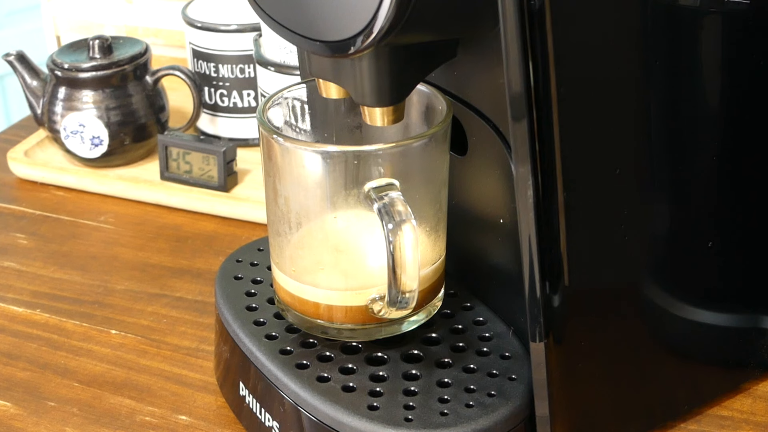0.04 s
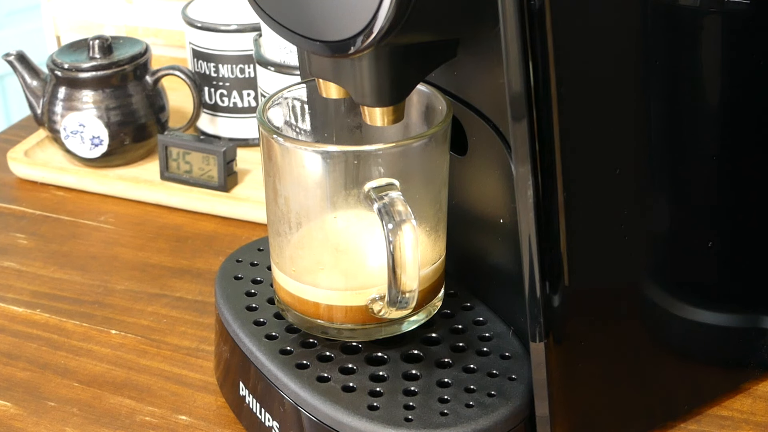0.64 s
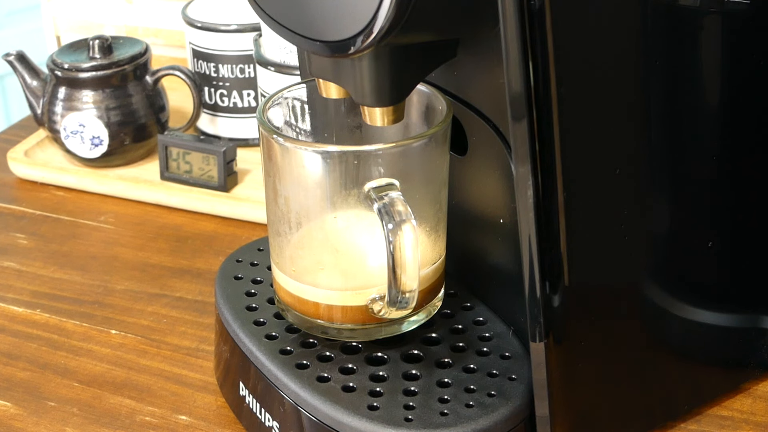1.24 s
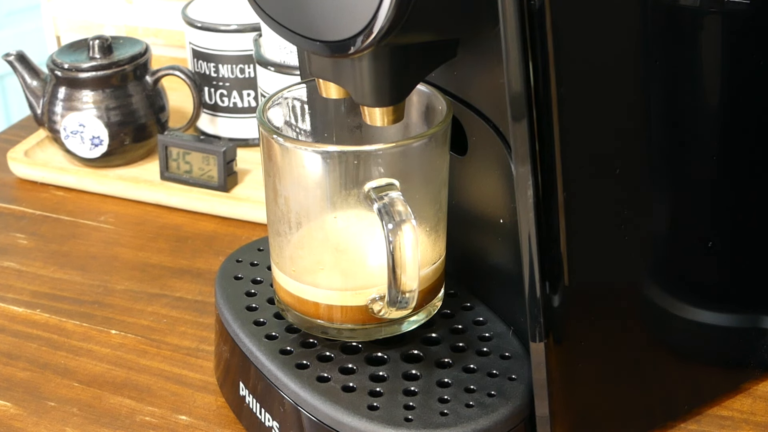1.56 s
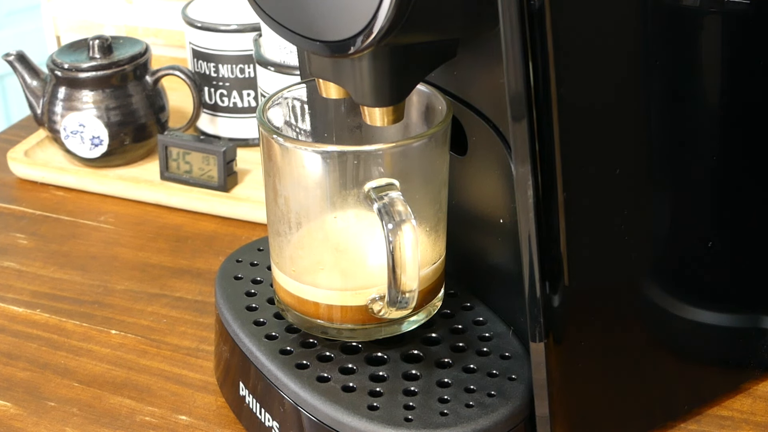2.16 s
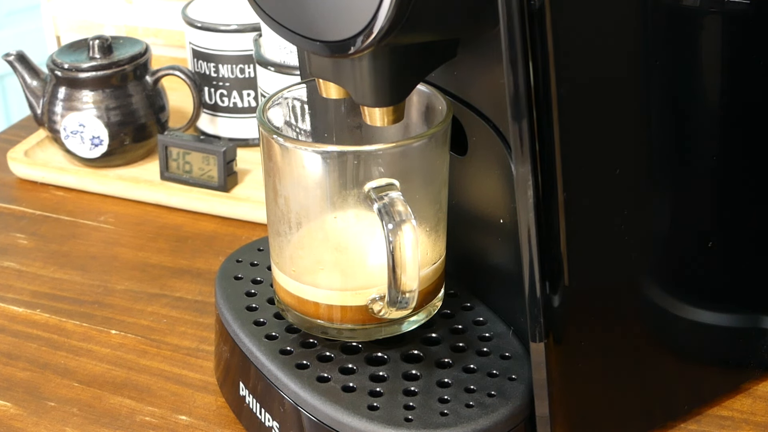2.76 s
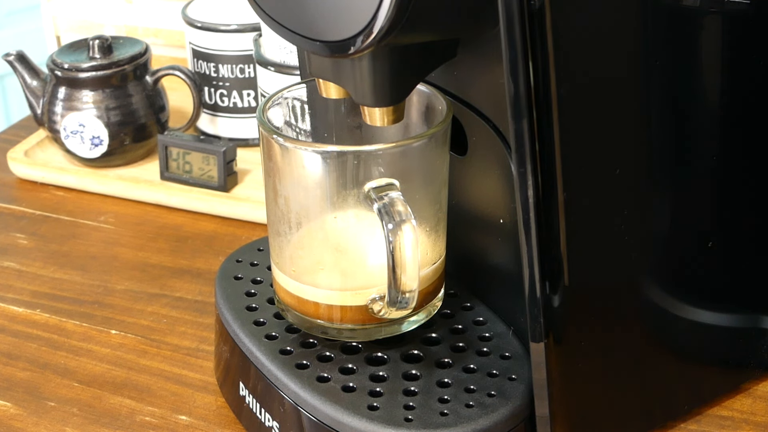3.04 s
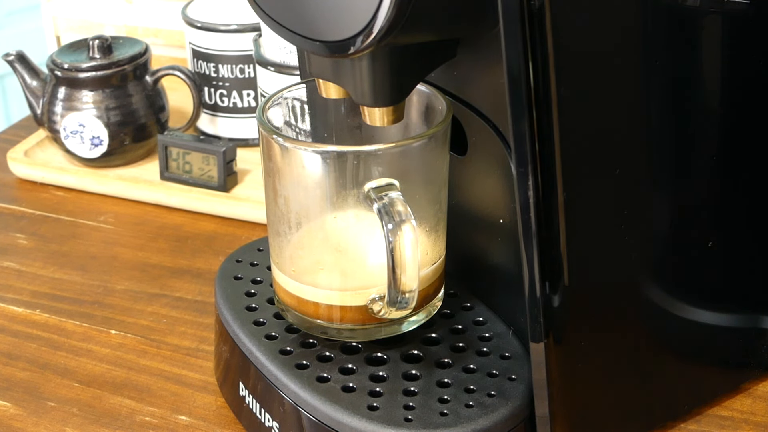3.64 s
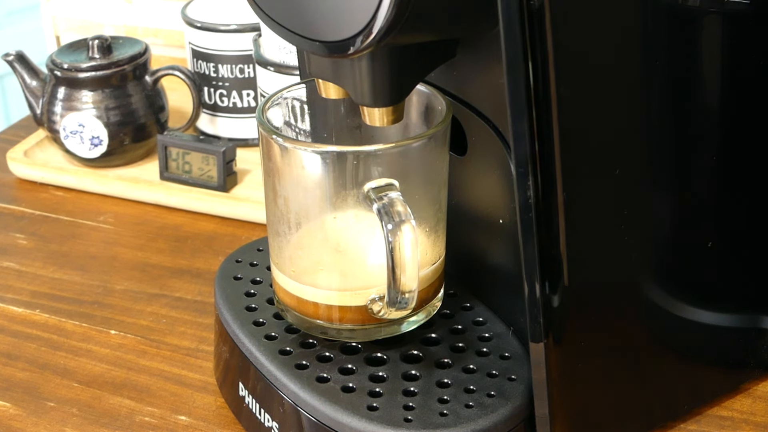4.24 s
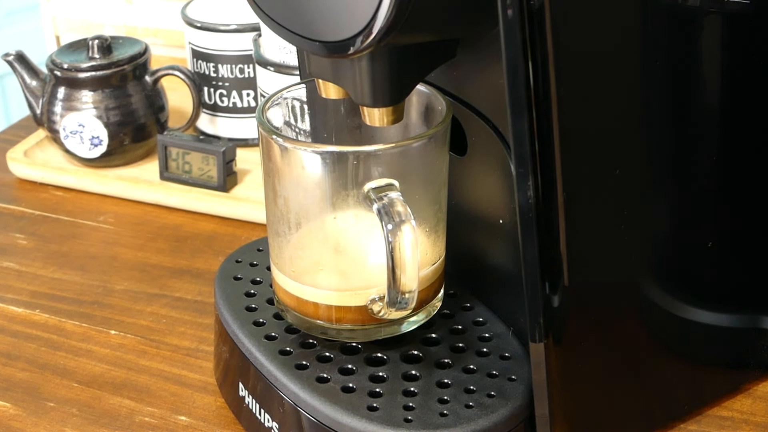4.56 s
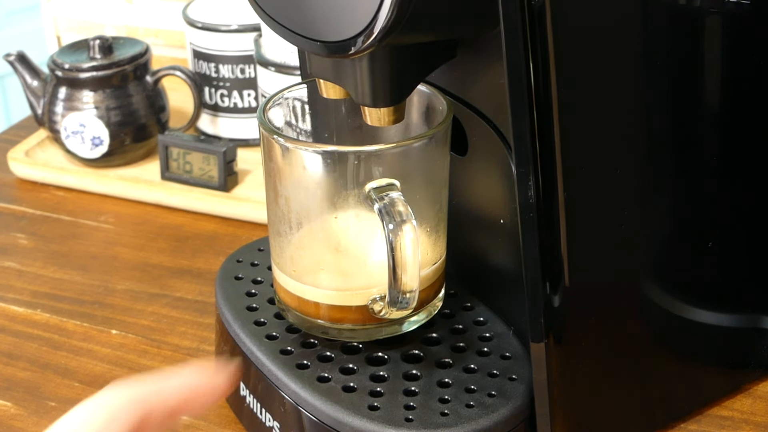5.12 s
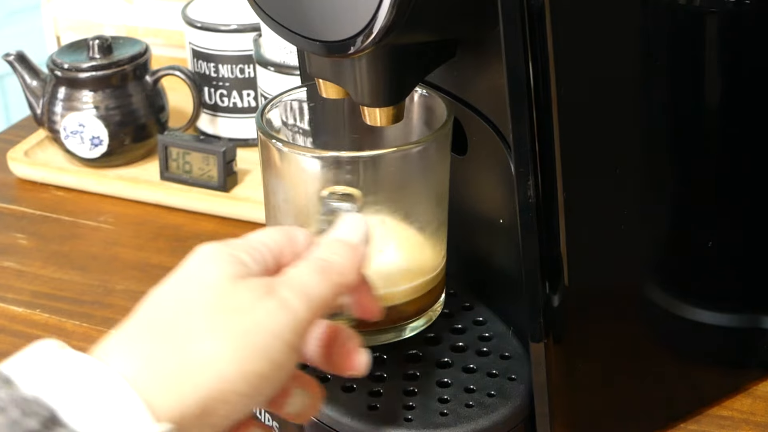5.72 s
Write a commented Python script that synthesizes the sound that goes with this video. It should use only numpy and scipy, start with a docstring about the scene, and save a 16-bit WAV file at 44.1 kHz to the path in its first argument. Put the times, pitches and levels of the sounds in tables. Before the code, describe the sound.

A coffee machine splutters at the end of its brew, heard close up in a bare, lively kitchen with faint room tone. It opens with a wet spit into a glass mug, and soft gurgling, fizzing foam and tiny bubble pops continue between irregular bursts. A cluster of spits with a low, hollow gulp comes at about 1.3 seconds. The loudest stretch runs from 2 to 3 seconds, with sharp, hissing splashes and hollow gulps of air in quick succession. Weaker spits follow until about 4.3 seconds, with a soft thud inside the machine near 3.9. At 4.7 seconds the housing gives a dull thump with a slight plastic rattle, while the bubbling dwindles. At about 5.5 seconds the mug knocks against the plastic drip tray, then scrapes lightly across it until the end, near 5.9 seconds.

```python
"""Capsule coffee machine, end of the brew.

A closely spaced pair of microphones near the machine, in a bare, lively kitchen. Air gulps through the
spout and spits the last coffee into a glass mug; foam fizzes and gurgles between the bursts. The housing
gives a dull thump, then a hand bumps the mug and drags it over the plastic drip tray."""
import sys
import numpy as np
from scipy import signal
from scipy.fft import rfft, irfft, next_fast_len
from scipy.io import wavfile

SR = 44100
rng = np.random.default_rng(int(sys.argv[2]) if len(sys.argv) > 2 else 0)


def wav_out(sig):
    """Save sig, one row per channel (or a flat mono array), as 16-bit PCM at SR to the path in sys.argv[1]."""
    wavfile.write(sys.argv[1], SR, np.round(np.clip(np.atleast_2d(sig).T, -1, 1) * 32767).astype(np.int16))


N = 259749
TIME = np.arange(N) / SR

# Spits of coffee and air. Each row: start in seconds, strength in dB, wetness (extra splash) in dB,
# extra mist in dB, swell in seconds.
SPIT_EVENTS = [(.001, -37, 6, -10.5, 0.00067), (.198, -52, 10, 9.5, 0.015), (.735, -50.5, 5.5, -2, 0.0057),
               (1.112, -52, -3.5, -10, 0.0017), (1.153, -45, -2.5, -0.5, 0.00044),
               (1.255, -34.5, 3, -11.5, .002), (1.272, -34.5, 4, -10, 0.0023), (1.385, -50, 12.5, -1, .003),
               (1.517, -47, 5.5, -2, .0005), (1.776, -39.5, -2.5, 0.5, 0.0004),
               (1.853, -37, -1, -18, 0.0033), (1.99, -43.5, -0.5, -1, .01), (2.148, -54, 13.5, 10, 0.00079),
               (2.188, -52, 3, 13, 0.0004), (2.296, -34, 0.5, -3.5, .003), (2.342, -25, 4.5, 1, 0.0017),
               (2.607, -35, 7.5, -5, 0.00025), (2.64, -25.5, 0.5, -6, 0.001), (2.723, -36, 7, 5, 0.00067),
               (2.995, -28, 2, -2.5, 0.0012), (3.184, -36, -3, -5.5, 0.0031), (3.362, -44.5, 0, 2, 0.0064),
               (3.385, -42.5, 3.5, -1.5, 0.0032), (3.859, -36, 3.5, -11.5, 0.0028),
               (3.971, -40.5, 2.5, -9, 0.0016), (4.016, -41, 0, -4.5, 0.0076),
               (4.196, -47, -2.5, -19, 0.0052), (4.291, -39.5, -13.5, -14, .003),
               (4.76, -52, -1.5, 2.5, 0.019)]
# Air leaking through the spout; it builds, then runs out. Each row: time in seconds, level in dB.
SPOUT_AIRFLOW = [(0, -47), (.42, -57.5), (.65, -52), (1.05, -56.5), (1.5, -50.5), (1.6, -46.5),
                 (2.25, -42.5), (2.53, -45), (2.9, -45.5), (3.14, -44.5), (3.3, -51), (3.5, -51.5),
                 (3.7, -57.5), (3.8, -48), (4.15, -55.5), (4.62, -64), (5.14, -56.5), (5.42, -76)]
# Spectrum of splashing coffee. Each row: ratio to the splash's pitch, level in dB.
SPLASH_SPECTRUM = [(.12, -41), (.25, -8.5), (.5, -7.5), (.75, -2.5), (1, 0), (1.4, -3), (2, -10),
                   (3.2, -17), (12, -41)]
# Spectra of the finest spray and of fizzing foam. Each row: frequency in Hz, level in dB.
MIST_SPECTRUM = [(200, -49), (3500, -2), (6000, 2), (8000, -3), (10000, 1.5), (12500, -4.5), (16000, -3.5)]
FIZZ_SPECTRUM = [(300, -84), (1500, 2.5), (2500, 4.5), (4800, -1.5), (7000, -7.5), (10000, -3),
                 (16000, -12.5)]


def from_db(db):
    """Decibels to gain."""
    return 10 ** (np.asarray(db) / 20)


def at_hz(points, hz):
    """Read a table on a log-frequency axis."""
    known_hz, value = np.transpose(points)
    return np.interp(np.log(np.maximum(hz, 1)), np.log(known_hz), value)


def in_time(rows):
    """Join rows of seconds and value into a curve as long as the scene."""
    return np.interp(TIME, *np.transpose(rows))


def add(track, start_s, sound):
    """Mix a sound into a track at a time."""
    i = max(0, round(start_s * SR))
    track[i:i + len(sound)] += sound[:N - i]


def colour(noise, spectrum):
    """Give a steady noise a spectrum and an rms of 1."""
    n = noise.shape[-1]
    size = next_fast_len(n)
    gain = from_db(at_hz(spectrum, np.fft.rfftfreq(size, 1 / SR)))
    shaped = irfft(rfft(noise, size) * gain, size)[..., :n]
    return shaped / np.sqrt(np.mean(shaped ** 2) + 1e-20)


def clicks(n, per_s, spread_db):
    """Random clicks of uneven size."""
    sizes = from_db(spread_db * np.minimum(rng.exponential(1, n), 4)) * rng.choice([-1, 1], n)
    return sizes * (rng.random(n) < per_s / SR)


def ring(t, hz, t60, wave=np.sin):
    """A struck mode that falls 60 dB in t60 seconds."""
    return wave(2 * np.pi * hz * t) * np.exp(-np.log(1000) * t / t60)


def struck(modes):
    """One blow on a body; every mode's strength varies a little from blow to blow."""
    t = TIME[:SR // 3]
    return sum(from_db(db + rng.normal(0, 1)) * ring(t, hz, t60) for hz, db, t60 in modes)


def radiate(x, lowest_hz=140):
    """Small bodies radiate little bass."""
    return signal.sosfilt(signal.butter(4, lowest_hz, "high", fs=SR, output="sos"), x + 1e-18)


def diffuse(n, likeness):
    """White noise arriving from all sides at the microphone pair."""
    mid, side = rfft(rng.standard_normal((2, n)))
    alike = np.clip(at_hz(likeness, np.fft.rfftfreq(n, 1 / SR)), 0, .99)
    return irfft(np.sqrt((1 + alike) / 2) * mid + np.sqrt((1 - alike) / 2) * side * [[1], [-1]], n)


def room_tone(air_db=-50.5, hum_hz=49, hum_db=-70):
    """Still room air all round, and the low hum of an appliance toward the left."""
    # Spectrum of the still room. Each row: frequency in Hz, level in dB.
    air_spectrum = [(25, -37), (70, -8), (110, -4), (160, -6), (220, 1), (420, 2.5), (630, 0.5),
                    (850, -5.5), (1200, -5), (1800, -14), (4000, -18), (10000, -23), (16000, -23)]
    # Its likeness at the two microphones. Each row: frequency in Hz, correlation.
    air_likeness = [(60, 0.012), (200, 0.057), (600, 0.067), (2000, 0.061), (4500, 0.34), (8000, 0.65),
                    (13000, 0.48)]
    air = from_db(air_db) * colour(diffuse(next_fast_len(N), air_likeness)[:, :N], air_spectrum)
    hum = from_db(hum_db) * np.sqrt(2) * np.sin(2 * np.pi * hum_hz * TIME)
    return air * from_db([[-.7], [.7]]) + hum * from_db([[2], [-3]])


def kitchen(x, direct_db=-2, nook_db=-5, build_s=0.0015, left_db=-0.1):
    """The microphones hear direct sound, standing waves and a dense tail that dies band by band."""
    # Likeness of the reflections at the two microphones. Each row: frequency in Hz, correlation.
    tail_likeness = [(100, 0.083), (250, 0.45), (600, 0.65), (1200, 0.64), (2200, 0.49), (4500, 0.84),
                     (8000, 0.92), (13000, 0.04)]
    # Reverberation of the kitchen. Each row: frequency in Hz, t60 in seconds.
    decay_times = [(120, 0.39), (400, 0.35), (1000, 0.41), (3000, 0.4), (7000, 0.32), (15000, 0.13)]
    # Standing waves around the machine. Each row: frequency in Hz, level in dB, t60 in seconds.
    nook_modes = [(234.4, -4, 0.093), (437, -1, 0.27), (544, 6.5, 0.24), (658.6, 9.5, 0.34),
                  (774, -3, 0.61), (835, 14.5, 0.53), (1016, 7, 1), (1110, -55, 1), (1513, -6, 0.64),
                  (1530, -7, 0.6), (1680, -25, 0.27), (2300, -52, 0.5), (2720, -18, 0.27), (4700, 4, 0.12),
                  (4600, -10, .15)]
    t = TIME[:SR * 2 // 3]
    noise, hz = rfft(diffuse(len(t), tail_likeness)), np.fft.rfftfreq(len(t), 1 / SR)
    centres = np.geomspace(100, 16000, 24)
    tail = 0
    for centre, pick in zip(centres, np.eye(len(centres))):
        share = at_hz(np.c_[centres, pick], hz)
        envelope = np.exp(-np.log(1000) * t / at_hz(decay_times, centre)) * (1 - np.exp(-t / build_s))
        band = irfft(noise * share, len(t)) * envelope
        # every band returns the same energy to each microphone
        tail = tail + band * np.sqrt(np.mean(share ** 2) / np.sum(band ** 2, axis=1, keepdims=True))
    nook = sum(from_db(db) * 2 * np.log(1000) / (t60 * SR) * ring(t, mode_hz, t60, np.cos)
               for mode_hz, db, t60 in nook_modes)
    echoes = signal.oaconvolve(x[None], tail + from_db(nook_db) * nook, axes=1)[:, :N]
    return (from_db(direct_db) * x + echoes) * from_db([[left_db], [-left_db]])


def bubbles(spectrum, per_s, spread_db, clumps_per_s=45, clump_db=1.7):
    """Bubbles burst in clumps: dense clicks whose level wanders quickly."""
    bursts = colour(clicks(N, per_s, spread_db), spectrum)
    clumps = clump_db * rng.standard_normal(400)
    return bursts * from_db(np.interp(TIME * clumps_per_s, np.arange(len(clumps)), clumps))


def stirred(levels_db, settle_s):
    """Each spit adds its energy to the mug, and the coffee settles again."""
    power, settling = np.zeros(N), np.exp(-TIME[:SR] / settle_s)
    for (start, *_), db in zip(SPIT_EVENTS, levels_db):
        add(power, start, (from_db(db) * settling) ** 2)
    return np.sqrt(power)


def foam(gurgle_db=-3, slosh_db=-16, slosh_hz=1150, fizz_db=-3, even_flow_db=-46.5):
    """Large bubbles gurgle in the spout, coffee sloshes after each splash, the crema fizzes."""
    # Spectrum of the large bubbles. Each row: frequency in Hz, level in dB.
    gurgle_spectrum = [(100, -17), (230, -3.5), (400, 0), (700, 3.5), (1200, 2), (1900, -9.5), (3000, -16),
                       (6000, -10.5), (16000, -40)]
    flow_db = in_time(SPOUT_AIRFLOW)
    _, strength, wetness, _, _ = np.transpose(SPIT_EVENTS)
    # the gurgle follows most of the airflow's swing; both airflow and spits feed the fizz
    gurgle = from_db(gurgle_db + even_flow_db + 0.93 * (flow_db - even_flow_db))
    slosh = stirred(strength + wetness + slosh_db, settle_s=0.098)
    fizz = from_db(fizz_db) * np.hypot(from_db(flow_db), stirred(strength - 10, settle_s=0.056))
    large = bubbles(gurgle_spectrum, per_s=900, spread_db=-0.5)
    middling = bubbles(np.multiply(SPLASH_SPECTRUM, [slosh_hz, 1]), per_s=1200, spread_db=6.5)
    tiny = bubbles(FIZZ_SPECTRUM, per_s=3500, spread_db=3.0)
    return gurgle * large + slosh * middling + fizz * tiny


def pops(per_s=22, level_db=7, spread_db=3, low_hz=700, high_hz=2600, t60=0.017):
    """Single small bubbles pop at random in the spout, louder while more air leaks through."""
    out, t = np.zeros(N), TIME[:SR // 16]
    flow_db = in_time(SPOUT_AIRFLOW)
    start = 0
    for wait, size, pitch in rng.random((400, 3)):
        start += -np.log(1 - wait) / per_s
        if start >= TIME[-1]:
            break
        db = flow_db[int(start * SR)] + level_db + spread_db * (2 * size - 1)
        add(out, start, from_db(db) * ring(t, low_hz * (high_hz / low_hz) ** pitch, t60))
    return out


def mug(bump_db=-5, slide_db=-1.0, slide_rise_s=0.038, brush_db=-55, brush_s=0.033):
    """Fingers brush the handle, the mug knocks on the tray, then slips over it in tiny jerks."""
    # The hand tips the mug against the tray. Each row: start in seconds, level in dB.
    bumps = [(5.467, -30.5), (5.477, -19.5), (5.494, -31)]
    # Ringing of the tray. Each row: frequency in Hz, level in dB, t60 in seconds.
    tray_modes = [(238, -43, 0.068), (418, -28, 0.032), (540, 2.5, 0.017), (746, -4, 0.028),
                  (1950, -17, .005), (3800, -16, 0.0085), (8900, -20, .004)]
    # Friction of the sliding mug. Each row: time in seconds, level in dB.
    friction = [(5.55, -60), (5.58, -52), (5.586, -54), (5.654, -49), (5.704, -65), (5.716, -48.5),
                (5.872, -41.5), (5.89, -40)]
    # Spectrum of glass scraping on plastic. Each row: frequency in Hz, level in dB.
    scrape_spectrum = [(200, -4), (400, -11), (700, -5.5), (1000, 2), (1200, -3), (1500, 3), (2000, -4.5),
                       (2550, -3), (3300, -13.5), (7000, -21), (15000, -23)]
    moving = np.clip((TIME - friction[0][0]) / slide_rise_s, 0, 1)
    jerks = colour(clicks(N, per_s=810, spread_db=0.5), scrape_spectrum)
    out = moving * from_db(in_time(friction) + slide_db) * jerks
    t = TIME[:SR // 4]
    brush = t / brush_s * np.exp(1 - t / brush_s) * colour(rng.standard_normal(len(t)), FIZZ_SPECTRUM)
    add(out, bumps[0][0], from_db(brush_db) * brush)
    for start, db in bumps:
        add(out, start, from_db(db + bump_db) * struck(tray_modes))
    return out


def thumps(level_db=-2, rattle_s=0.0097):
    """Dull blows inside the housing; a softer contact loses treble, and loose plastic rattles after."""
    # The blows. Each row: start in seconds, level in dB, treble cutoff in Hz, rattle level in dB.
    blows = [(3.862, -39, 600, -70), (3.911, -26, 600, -49), (4.7123, -23, 1500, -41.5),
             (4.722, -29, 1200, -64), (4.733, -20, 700, -67), (4.966, -39, 300, -69)]
    # Ringing of the housing. Each row: frequency in Hz, level in dB, t60 in seconds.
    housing_modes = [(134, -28, 0.094), (176, -28, 0.068), (248, -17.5, 0.16), (290, -8, 0.04),
                     (445, -5.5, 0.018), (705, 10, 0.0041), (1300, 5.5, 0.0053), (1540, -3, 0.011)]
    # Spectrum of the loose plastic. Each row: frequency in Hz, level in dB.
    rattle_spectrum = [(500, -38), (2300, -9), (3400, 5.5), (4500, -4), (7000, -15), (11000, -14),
                       (16000, -22)]
    out, t = np.zeros(N), TIME[:SR // 4]
    shaking = t / rattle_s * np.exp(1 - t / rattle_s)
    for start, db, cutoff_hz, rattle_db in blows:
        thud = signal.lfilter(*signal.butter(1, cutoff_hz, fs=SR), struck(housing_modes))
        rattle = shaking * colour(clicks(len(t), per_s=1300, spread_db=2), rattle_spectrum)
        add(out, start, from_db(db + level_db) * thud)
        add(out, start, from_db(rattle_db) * rattle)
    return out


def booms(hollow_hz=235, t60=0.14, swell_s=0.0071, level_db=-4):
    """The air in the brew head answers a pressure surge with one low, hollow note."""
    # Pressure surges. Each row: start in seconds, level in dB.
    surges = [(1.256, -18.5), (1.39, -31), (2.15, -25), (2.345, -29), (2.872, -27.5), (2.998, -19.5)]
    out, t = np.zeros(N), TIME[:SR // 3]
    note = ring(t, hollow_hz, t60) * (1 - np.exp(-t / swell_s))
    for start, db in surges:
        add(out, start, from_db(db + level_db) * note)
    return out


def gulps(level_db=-1, rise=0.029, swell_s=0.00071, ring_s=0.021):
    """Each air pocket rings briefly, rising in pitch as it opens."""
    # Air pockets breaking through the spout. Each row: start in seconds, level in dB, pitch in Hz.
    pockets = [(.002, -23.5, 527), (.735, -30, 1306), (1.226, -32.5, 330), (1.278, -19, 1080),
               (1.385, -36, 530), (1.996, -21.5, 487), (2.012, -22.5, 418), (2.149, -22.5, 482),
               (2.296, -18.5, 604), (2.341, -16, 770), (2.607, -9.5, 594), (2.724, -18, 625),
               (2.726, -13, 1028), (2.865, -26.5, 483), (2.996, -14, 552), (3.001, -18, 1626),
               (3.388, -25, 1470), (3.972, -25, 1490), (4.29, -31.5, 770)]
    out, t = np.zeros(N), TIME[:SR // 8]
    quickening = t * (1 + rise * np.minimum(t / ring_s, 1))
    for start, db, hz in pockets:
        gulp = ring(quickening, hz / (1 + rise / 2), ring_s) * (1 - np.exp(-t / swell_s))
        add(out, start, from_db(db + level_db) * gulp / np.abs(gulp).max())
    return out


def snaps(level_db=12, abrupt_s=0.0017, length_s=0.00069):
    """An abrupt spit opens with the crisp snap of a bursting film; a slow one has none."""
    out, t = np.zeros(N), TIME[:SR // 50]
    for start, strength, _, mist, swell in SPIT_EVENTS:
        crack = colour(rng.standard_normal(len(t)), MIST_SPECTRUM) * np.exp(-t / length_s)
        add(out, start, from_db(strength + mist + level_db) * np.exp(-swell / abrupt_s) * crack)
    return out


def rasps(level_db=-11, dry_share=0.74, length_s=0.021):
    """The drier a spit, the more its air rasps at the lip of the spout."""
    # Spectrum of air at the lip. Each row: frequency in Hz, level in dB.
    lip_spectrum = [(1500, -38), (2800, -14), (3600, -1), (4700, -6), (5500, -6), (7500, -32)]
    out, t = np.zeros(N), TIME[:SR // 4]
    for start, strength, wetness, _, swell in SPIT_EVENTS:
        jet = (1 - np.exp(-t / swell)) * np.exp(-t / length_s)
        rasp = jet / jet.max() * colour(clicks(len(t), per_s=2000, spread_db=4.5), lip_spectrum)
        add(out, start, from_db(strength + level_db - dry_share * wetness) * rasp)
    return out


def spits(hiss_db=-2, mist_db=-2, usual_s=0.034, tearing_s=0.00018, spots=3):
    """A jet tears coffee into a splash, a hiss and a fine mist. One track per landing spot."""
    # Spectrum of the hiss at the spout. Each row: ratio to the hiss's pitch, level in dB.
    hiss_spectrum = [(.07, -69), (.3, -51), (.6, 0.5), (1, 3), (1.35, -2.5), (2, -6.5), (3, -25), (6, -72)]
    out, t = np.zeros((spots, N)), TIME[:SR // 4]
    for k, (start, strength, wetness, mist, swell) in enumerate(SPIT_EVENTS):
        # a wetter spit throws larger drops and sounds lower
        splash_hz = 1382 * 2 ** (-0.0769 * wetness)
        hiss_hz = 3060 * 2 ** (-0.27 * wetness)
        sprays = ((np.multiply(SPLASH_SPECTRUM, [splash_hz, 1]), wetness),
                  (np.multiply(hiss_spectrum, [hiss_hz, 1]), hiss_db),
                  (MIST_SPECTRUM, mist + mist_db))
        decay_s = 0.015 + 1.23 * swell
        for fineness, (spectrum, db) in enumerate(sprays):
            rise_s = swell + fineness * tearing_s  # finer drops take a little longer to tear off
            jet = (1 - np.exp(-t / rise_s)) * np.exp(-t / decay_s)
            spray = jet * colour(clicks(len(t), per_s=8000, spread_db=3.5), spectrum)
            # a longer spit spreads the same energy more thinly
            spray *= np.sqrt(usual_s * SR / np.sum(spray ** 2))
            add(out[k % spots], start, from_db(strength + db) * spray)
    return out


def scene(body_left_db=-1.1):
    """Each spot that sounds reaches the microphones by its own set of reflections."""
    machine = kitchen(radiate(gulps() + booms() + thumps())) * from_db([[body_left_db], [-body_left_db]])
    spray = sum(kitchen(radiate(spot)) for spot in spits())
    cup = kitchen(radiate(foam() + pops() + snaps() + rasps() + mug()))
    return machine + spray + cup + room_tone()


def record(dry, cutoff_hz=15700):
    """The highest treble is cut steeply."""
    return signal.sosfilt(signal.ellip(10, .2, 70, cutoff_hz, fs=SR, output="sos"), dry)


dry = scene()
out = record(dry)
wav_out(out)
```